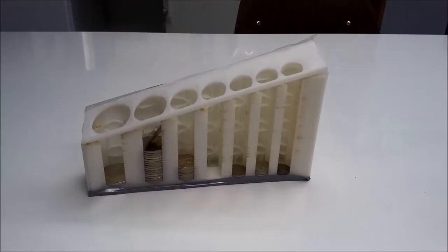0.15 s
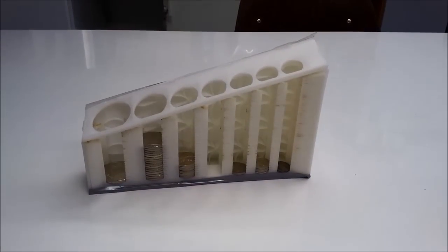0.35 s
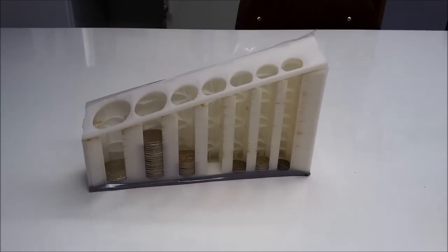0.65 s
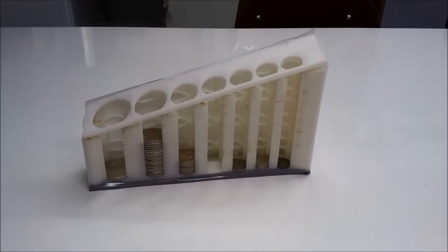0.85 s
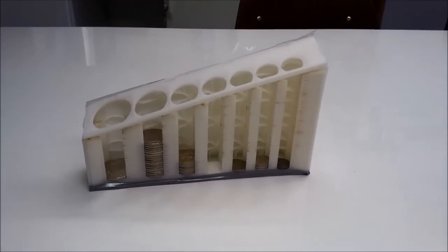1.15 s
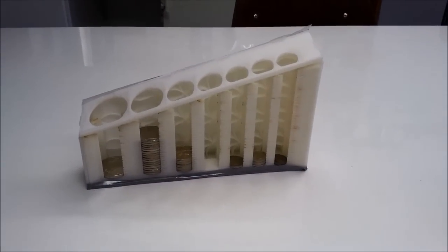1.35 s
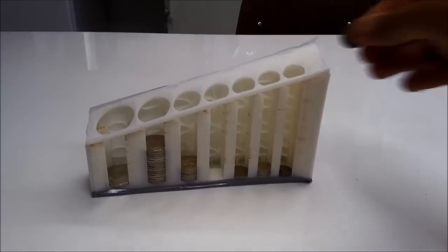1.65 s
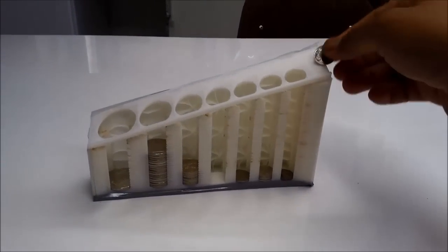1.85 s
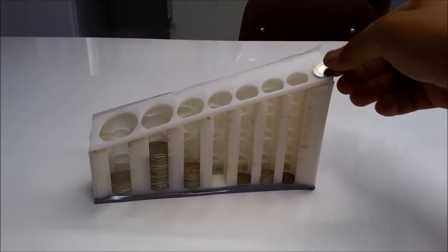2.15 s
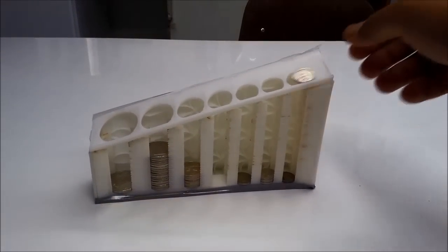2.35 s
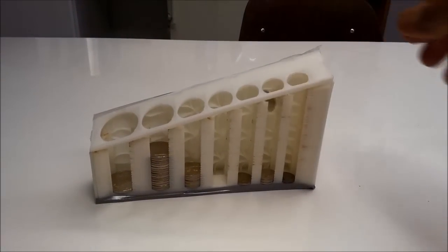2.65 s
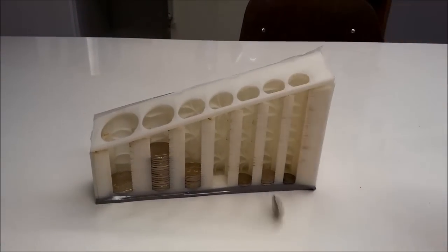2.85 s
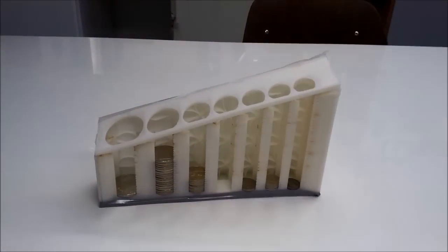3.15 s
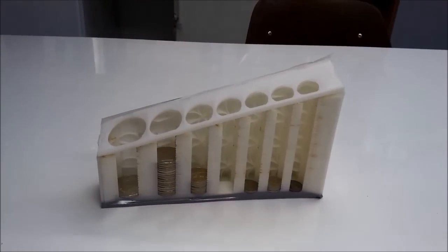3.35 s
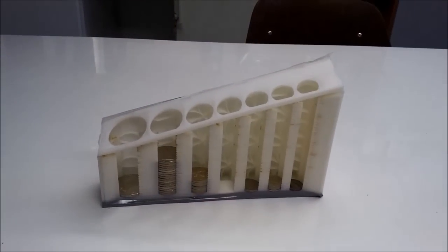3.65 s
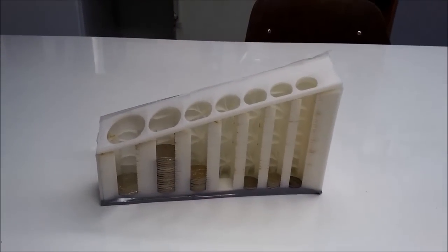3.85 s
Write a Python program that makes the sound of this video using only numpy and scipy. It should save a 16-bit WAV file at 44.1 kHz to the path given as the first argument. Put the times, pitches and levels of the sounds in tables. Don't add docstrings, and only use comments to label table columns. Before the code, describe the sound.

Coins in a plastic sorter on a table: a large one clacks onto its stack, a quiet pause, then a small one taps, slides, tumbles and bounces with bright clinks; close phone microphone, small quiet room.

```python
import sys
import numpy as np
from scipy import signal
from scipy.fft import rfft, irfft
from scipy.io import wavfile
from scipy.ndimage import uniform_filter1d

SR = 44100
rng = np.random.default_rng(int(sys.argv[2]) if len(sys.argv) > 2 else 0)


def volts_from_db(level):
    exponent = np.asarray(level, float) / 20
    return 10 ** exponent


def digitize_waveform(pressure):
    field = np.atleast_2d(pressure).T
    bounded = np.clip(field, -1, 1)
    quanta = np.round(bounded * 32767).astype(np.int16)
    wavfile.write(sys.argv[1], SR, quanta)


N = 176400
PORT_WIDE = 0.89
MID_TO_SIDE = np.array([[1], [-1]])

# (time [s], peak level [dB], low knock re peak [dB], treble re peak [dB], coin ring re peak [dB])
BIG_HITS = [(0.003, -26.5, 2, -24.5, -33), (0.039, -30.5, 15, -13, -32.5), (0.0595, -7.5, -20, -3.5, -26.5),
            (0.096, -25.5, -18, -24, -24), (0.134, -41.5, -8.5, -15, -33), (0.2125, -17, -17, -14, -39),
            (0.231, -41, -22, -20, -36), (0.2885, -21, -13, -25, -40), (0.321, -31, -8.5, -9, -34.5),
            (0.336, -36, -12, -8, -30.5), (0.349, -40, -20, -12, -23), (0.369, -25.5, -13, -2.5, -25.5),
            (0.397, -39.5, 8, 1, -26), (0.407, -9.5, -20.5, -2.5, -21.5)]
# (frequency [Hz], level [dB], T60 [s])
BIG_COIN = [(3650, -6, .14), (3820, -15, .4), (6450, -6, .06), (8940, -2, .3), (9130, -2, .3),
            (14130, 0, .07), (15230, 5, .18), (15440, 8, .15)]
# (frequency [Hz], level [dB], T60 [s])
PLASTIC = [(500, -12, 0.053), (848, 4, 0.03), (1088, 11, 0.025), (1438, 7.5, 0.0192), (1917, 3, 0.054),
           (2448, 8, 0.022), (3270, 10, 0.02), (4587, 4.5, 0.021), (6080, 4, 0.022)]


def big_coin():
    return blows(BIG_HITS, BIG_COIN, PLASTIC, rise_s=.001, fall_s=.0035, pan_db=.5, lag_samples=2,
                 wobble=.7, thud_db=-31.5)


# (time [s], peak level [dB], low knock re peak [dB], treble re peak [dB], coin ring re peak [dB])
TOUCHES = [
    (1.024, -47.5, -17.5, -16, -44.5),
    (1.928, -39.5, 3.5, -3, -44),
    (1.988, -47.5, 10.5, -39, -58),
    (2.262, -51, 11, -29, -41),
    (2.305, -29, -11.5, -11.5, -53),
    (2.531, -27.5, -8, -15.5, -44),
    (2.556, -33.5, -15, -14, -47),
    (2.623, -45, -15, -6, -38),
    (2.658, -34, -24, -9, -39),
]
TUMBLE = [(2.6845, -24, -6, -15, -40), (2.7195, -13, -25, -14, -36), (2.764, -30, 3, -10, -28),
          (2.792, -32, -15, -20, -25), (2.7985, -19, -18, -8, -34), (2.8225, -18, -18, -12, -36),
          (2.828, -24, -18, -12, -36), (2.854, -22, -6, -2, -34), (2.8712, -14, -5, -15, -40),
          (2.8918, -15, -19, -2, -34), (2.9075, -7, -22, -3, -40), (2.916, -17, -15, -8, -38),
          (2.924, -20, -15, -8, -35), (2.947, -26, -5, -3, -28), (2.969, -3, -20, -8, -50),
          (2.9725, -6, -20, -14, -45), (3.048, -6, -20, -6, -45), (3.0595, -9, -20, -8, -39),
          (3.1328, -11, -22, -8, -45), (3.140, -14, -24, -4, -42), (3.147, -15, -18, -10, -39),
          (3.219, -30, -25, -5, -28)]
BOUNCES = [(3.287, -33, -16, -23, -35), (3.294, -33, -15.5, 3, -25), (3.3035, -16.5, -28, 1, -29),
           (3.309, -19, -28, -2, -28), (3.4195, -13, -40, -1, -28.5), (3.5065, -19, -46, -1.5, -37),
           (3.59, -18.5, -36, -2.5, -30), (3.663, -21, -38, -5, -35), (3.731, -20, -46, -6, -34),
           (3.7945, -19, -24.5, -2.5, -22), (3.804, -25.5, -25, -4, -16), (3.852, -22, -27, -3.5, -30),
           (3.905, -23, -24, -1, -21), (3.916, -26, -19, -1.5, -22), (3.929, -29.5, -7, 2, -18),
           (3.958, -22, -22.5, -2.5, -25)]
# (frequency [Hz], level [dB], T60 [s])
SMALL_COIN = [(5100, -10, .1), (11490, 7, .6), (11535, 0, .5), (3450, -5, .06), (5460, -6, .22),
              (6450, -10, .2), (4500, -10, .2)]
# (frequency [Hz], level [dB], T60 [s])
STACK = [(970, 0.5, 0.042), (1845, 2, .03), (2375, 3.5, 0.035), (2898, 4, .02), (3397, 8, 0.028),
         (4380, 10.5, 0.0067), (5680, 4.5, 0.02), (6750, -1, 0.013), (9140, 6.5, 0.015)]


def small_coin():
    touches = blows(TOUCHES, SMALL_COIN, PLASTIC, rise_s=.0012, fall_s=.005, pan_db=.5, lag_samples=2,
                    wobble=.1, thud_db=-18.5)
    tumble = blows(TUMBLE, SMALL_COIN, PLASTIC, rise_s=.0005, fall_s=.0018, pan_db=.5, lag_samples=4,
                   wobble=.15, thud_db=-18.5)
    bounces = blows(BOUNCES, SMALL_COIN, STACK, rise_s=.003, fall_s=.003, pan_db=-1.5, lag_samples=2,
                    wobble=.15, thud_db=-23)
    return touches + tumble + bounces


def blows(table, coin, frame_modes, rise_s, fall_s, pan_db, lag_samples, wobble, thud_db):
    clatter, rings = np.zeros((2, 2, N + SR))
    next_times = [row[0] for row in table[1:]] + [np.inf]
    for (s, db, low_db, high_db, ring_db), next_s in zip(table, next_times):
        i = max(int((s - rise_s / 2) * SR), 0)
        contact = contact_clatter(frame_modes, rise_s, fall_s, low_db, high_db)
        clatter[:, i:i + contact.shape[1]] += volts_from_db(db) * contact
        coin_part = coin_ring(coin, next_s - s, wobble)
        rings[:, i:i + coin_part.shape[1]] += volts_from_db(db + ring_db) * coin_part
        thud = table_thud()
        rings[:, i:i + len(thud)] += volts_from_db(db + low_db + thud_db) * thud
    return np.array([place(clatter[:, :N], pan_db, lag_samples), rings[:, :N]])


def contact_clatter(frame_modes, rise_s, fall_s, low_db, high_db):
    t = np.arange(2048) / SR - 2 * rise_s
    shared = .6
    luck = rng.standard_normal((4, len(t)))
    chatter = shared * luck[0] + np.sqrt(1 - shared ** 2) * luck[1:3]
    chatter = chatter * volts_from_db(2.5 * luck[3])
    chatter = chatter * np.exp(-np.maximum(t, 0) / fall_s - (np.minimum(t, 0) / rise_s) ** 2)
    push = np.exp(-(t / .0003) ** 2) * np.ones((2, 1))
    frame = ring(frame_modes, len(t), scatter_db=4, shift=.05)
    frame = frame / np.sqrt(np.sum(frame ** 2))

    def strike(force, direct, lo_hz, hi_hz):
        body = (1 - direct) * frame
        body[0] += direct
        part = signal.fftconvolve(force, body[None])[:, :len(t)]
        return unit(band(part, lo_hz, hi_hz))

    knock = volts_from_db(low_db + 4.37) * strike(push, 0, 350, 2070)
    clack = volts_from_db(-1.5) * strike(chatter, .58, 1337, 6400)
    tick = volts_from_db(high_db + 4.6) * strike(-chatter, 1, 6700, 12300)
    return knock + clack + tick


def coin_ring(coin, gap_s, wobble):
    size, swell_s, choke_s = SR // 3, .002, .002
    after = np.arange(size) / SR
    swell = 1 - np.exp(-after / swell_s)
    sway = 1 + wobble * rms1(band(rng.standard_normal(size), 11, 320))
    choke = np.exp(-np.maximum(after - gap_s, 0) / choke_s)
    end_fade = np.minimum(10 * (1 - np.arange(size) / size), 1)
    held = min(size, int(min(gap_s, 1) * SR) + 800)
    ports = np.array([ring(coin, held, 1.5, .0002, turn) for turn in (0, 1.1)])
    return (swell * sway * choke * end_fade)[:held] * ports


def table_thud():
    size, swell_s = SR // 3, .008
    table_top, slot_air = (147, 0, 0.27), (424.4, -1, 0.41)  # (frequency [Hz], level [dB], T60 [s])
    return (1 - np.exp(-np.arange(size) / SR / swell_s)) * ring([table_top, slot_air], size, 2.8)


def ring(modes, size, scatter_db, shift=0.00091, turn=0):
    t = np.arange(size) / SR
    hz, db, t60 = np.array(modes).T[:, :, None]
    level_luck, pitch_luck, phase_luck = rng.standard_normal((3, len(modes), 1))
    fade = volts_from_db(db + scatter_db * level_luck - 60 * t / t60)
    phase = 2 * np.pi * hz * (1 + shift * pitch_luck) * t + turn * phase_luck
    return (fade * np.sin(phase)).sum(axis=0)


# (time [s], level [dB])
SLIDE = [(1.93, -49), (2.02, -65), (2.08, -51), (2.16, -64), (2.22, -73), (2.3, -52), (2.34, -48),
         (2.45, -52), (2.6, -48), (2.67, -42.5), (2.72, -49)]
# (time [s], level [dB])
RATTLE = [(0, -36.5), (.04, -41), (.2, -62), (.29, -66), (.34, -41), (.4, -42.5), (.42, -120), (2.7, -120),
          (2.74, -50), (2.9, -37), (3.1, -40.5), (3.22, -35.5), (3.27, -46), (3.4, -50), (3.6, -47.5),
          (3.78, -47.5), (3.85, -40.5), (4, -45.5)]
# (frequency [Hz], width [Hz], level [dB])
SLIDE_PEAKS = [(464, 206, 2), (1014, 148, 8), (1480, 620, 1.5), (1910, 220, 6), (2600, 350, -7),
               (2900, 540, -16), (4900, 630, -15)]


def slide():
    grains = sparse_grains(.15, 1.5)
    steps = np.repeat(rng.standard_normal(N // 500 + 1), 500)[:N]
    grains = grains * volts_from_db(3 * uniform_filter1d(steps, 300))
    ramp = 0
    for hz, width_hz, db in SLIDE_PEAKS:
        peak = rms1(band(grains, hz - width_hz / 2, hz + width_hz / 2))
        ramp = ramp + volts_from_db(db) * np.sqrt(width_hz) * peak
    scrape = volts_from_db(-8) * rms1(band(grains, 730, 6100))
    sliding = rms1(ramp) + scrape

    ticks = rms1(sparse_grains(.02, 3.5))
    stack_ticks = signal.fftconvolve(ticks, rms1(ring(STACK, 840, 1.3)))[:N] / 32
    rattle = rms1(band(grains + 0.31 * stack_ticks, 960, 7200))
    return place(sliding * volts_from_db(curve_db(SLIDE)) + rattle * volts_from_db(curve_db(RATTLE)), 0.63, 3.4)


def sparse_grains(chance, spread_db):
    hit = rng.random(N) < chance
    return rng.standard_normal(N) * hit * volts_from_db(spread_db * rng.exponential(size=N))


# (frequency [Hz], T60 [s])
ROOM_T60 = [(200, 0.33), (1000, 0.29), (4000, 0.26), (10000, 0.27), (14000, 0.13)]


def room(x):
    level_db, tilt_db_per_octave, above_10k_db = -4, -1.73, -5
    gap_s, narrow_below_hz = .006, 670
    hz, t60 = np.array(ROOM_T60).T
    fill = np.exp(-2 / SR / gap_s)
    out = 0
    for f in 160 * 2 ** (np.arange(20) / 3):
        top = f * 2 ** (1 / 3)
        fade = volts_from_db(-120 / SR / np.interp(np.log(f), np.log(hz), t60))
        energy = signal.lfilter([1 - fade], [1, -fade], band(x, f, top) ** 2)
        for _ in range(2):
            energy = signal.lfilter([1 - fill], [1, -fill], energy)
        mid, side = rms1(band(rng.standard_normal((2, N)), f, top))
        wide = PORT_WIDE * min(f / narrow_below_hz, 1)
        echoes = np.sqrt(np.abs(energy) / (1 + wide ** 2)) * (mid + wide * side * MID_TO_SIDE)
        out = out + volts_from_db(tilt_db_per_octave * np.log2(f / 1000) + above_10k_db * (f > 10 ** 4)) * echoes
    return volts_from_db(level_db) * out


# (frequency [Hz], level [dB])
HUM = [(100, -64.5), (200, -60.5), (250, -72), (300, -69.5), (400, -74), (900, -77.5)]
# (frequency [Hz], density [dB per Hz])
HISS = [(15, -42), (25, -16.5), (48, -12), (200, -5), (354, -13), (911, -18.5), (1070, -19.5), (5280, -26),
        (16000, -36.5)]


def floor():
    t = np.arange(N) / SR
    f = np.maximum(np.arange(N // 2 + 1) * SR / N, 1)
    hz, db = np.array(HISS).T
    colour = volts_from_db(np.interp(np.log(f), np.log(hz), db))
    mid, side = irfft(rfft(rng.standard_normal((2, N))) * colour, N)
    bass_wide = 0.26
    hiss = mid + (bass_wide * side + PORT_WIDE * band(side, 300, 18000)) * MID_TO_SIDE
    hiss = hiss * volts_from_db(-70) / np.std(band(mid, 1000, 8000))
    hum = sum(volts_from_db(db + 2) * np.sin(2 * np.pi * hz * t + rng.random() * 2 * np.pi) for hz, db in HUM)
    rustle_s, rustle_long_s, rustle_db = 1.69, 0.17, -73
    rustle = rms1(band(rng.standard_normal((2, N)), 9100, 10900))
    rustle = rustle * volts_from_db(rustle_db) * np.exp(-((t - rustle_s) / rustle_long_s) ** 2)
    return hiss + hum + rustle


def band(x, lo_hz, hi_hz):
    return signal.sosfilt(signal.butter(2, [lo_hz, min(hi_hz, 20000)], "band", fs=SR, output="sos"), x)


def unit(x):
    return x / np.abs(x).max()


def rms1(x):
    return x / np.sqrt(np.mean(x ** 2))


def place(x, pan_db, lag_samples):
    left, right = x * np.ones((2, 1))
    return np.array([np.roll(left, int(lag_samples)) * volts_from_db(pan_db / 2), right * volts_from_db(-pan_db / 2)])


def curve_db(table):
    s, db = np.array(table).T
    return np.interp(np.arange(N) / SR, s, db, left=-120, right=-120)


def scene():
    clatter, rings = big_coin() + small_coin()
    near = clatter + slide()
    return near + rings + room(near[1]) + floor()


def roll_off(x):
    return signal.sosfilt(signal.butter(12, 17010, fs=SR, output="sos"), x)


# (frequency [Hz], left-right level [dB])
PORT_TILT = [(60, -5), (200, -2.5), (700, -0.5), (1290, 2.5), (2380, 1.5), (4400, -0.5), (8120, -2),
             (15000, 1)]


def record(dry):
    dull_hz, top_hz = 11000, 16200
    dip_hz, dip_wide_hz, dip_share = 7900, 1510, 0.62
    hz, db = np.array(PORT_TILT).T
    tilt_db = np.interp(np.log(np.arange(N // 2 + 1) * SR / N + 1), np.log(hz), db)
    x = irfft(rfft(dry) * volts_from_db(np.array([tilt_db, -tilt_db]) / 2), N)
    x = signal.sosfilt(signal.butter(1, dull_hz, fs=SR, output="sos"), x)
    x = x - dip_share * signal.lfilter(*signal.iirpeak(dip_hz, dip_hz / dip_wide_hz, fs=SR), x)
    x = signal.sosfilt(signal.butter(8, top_hz, fs=SR, output="sos"), x)
    return roll_off(x)


dry = scene()
out = record(dry)
digitize_waveform(out)
```